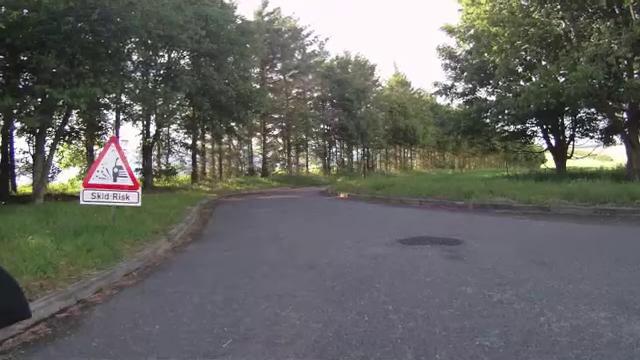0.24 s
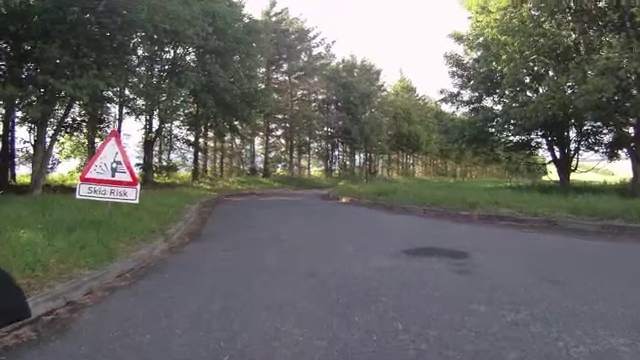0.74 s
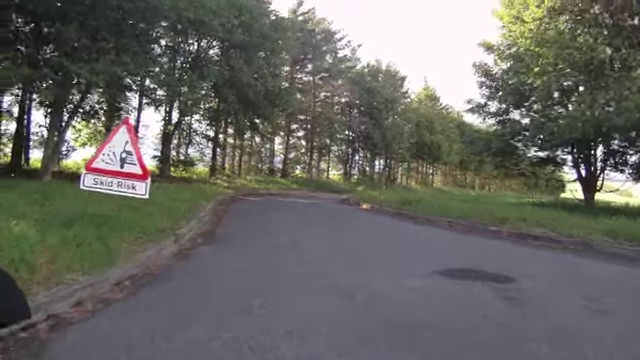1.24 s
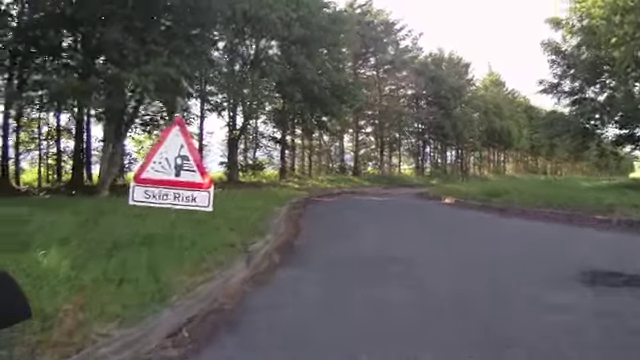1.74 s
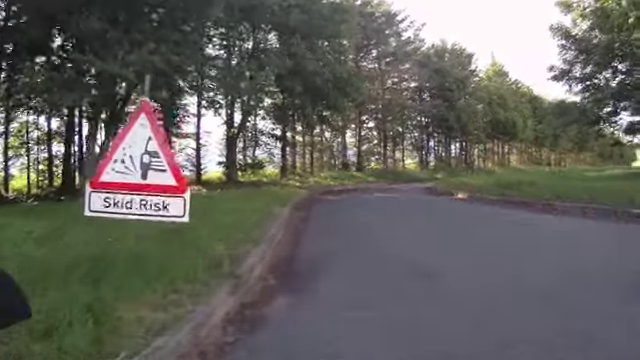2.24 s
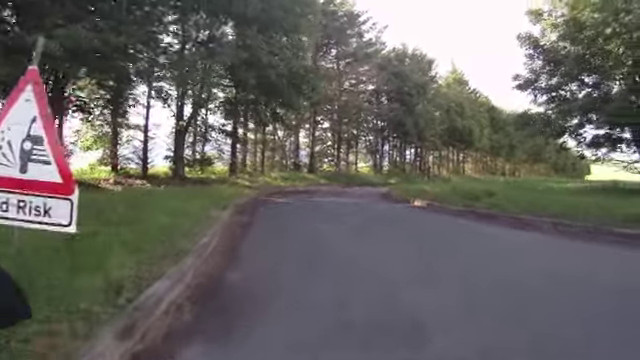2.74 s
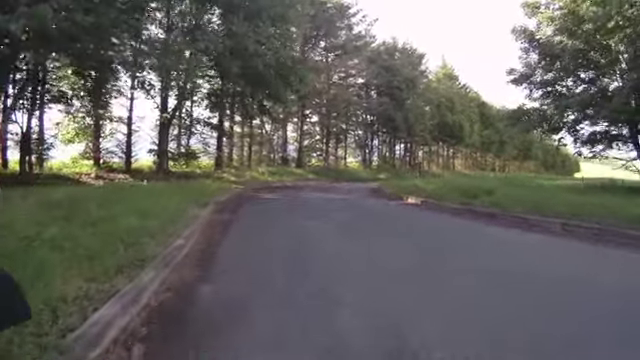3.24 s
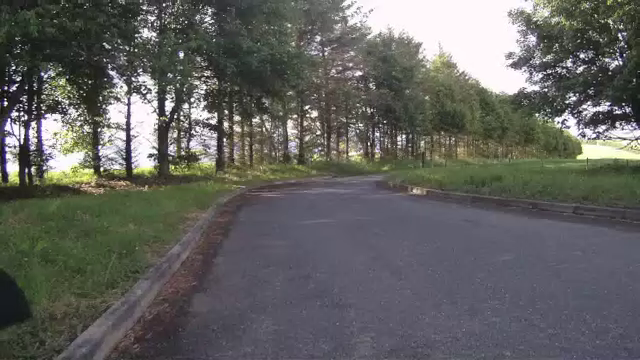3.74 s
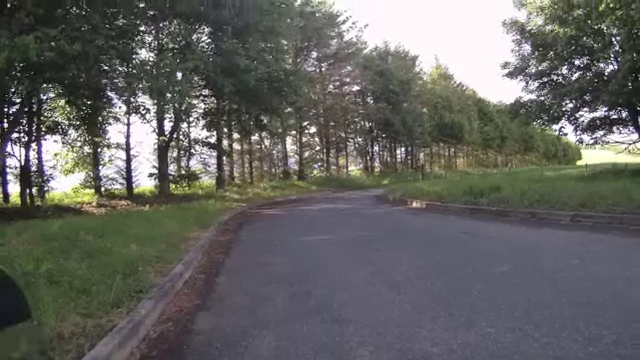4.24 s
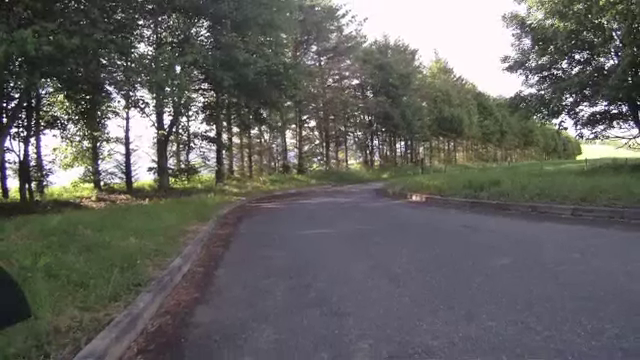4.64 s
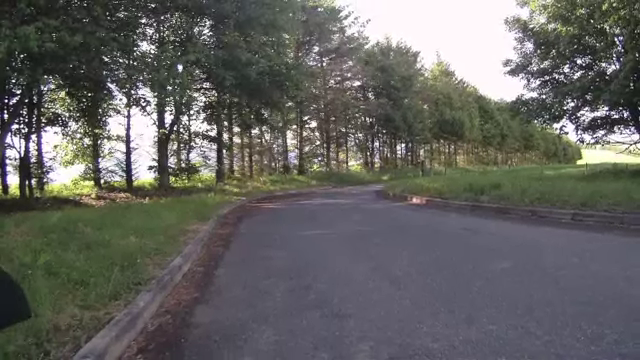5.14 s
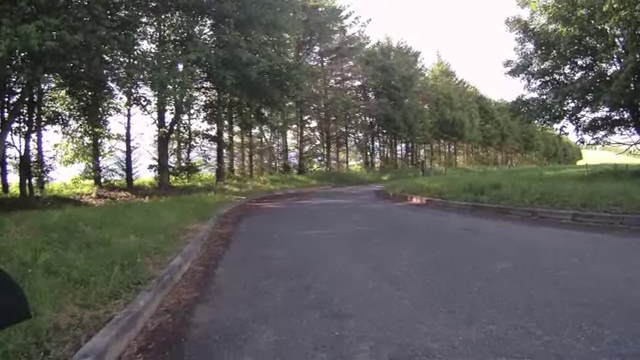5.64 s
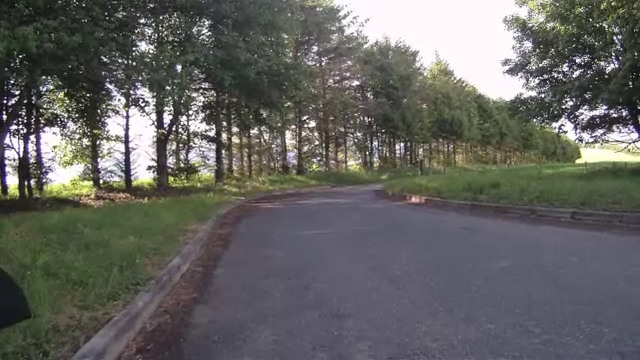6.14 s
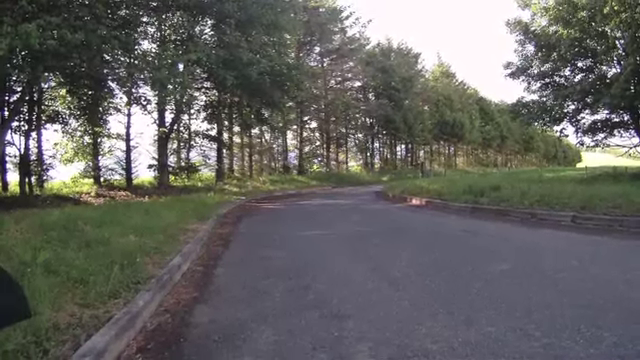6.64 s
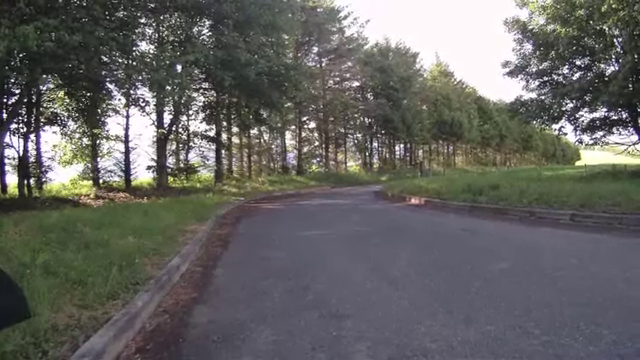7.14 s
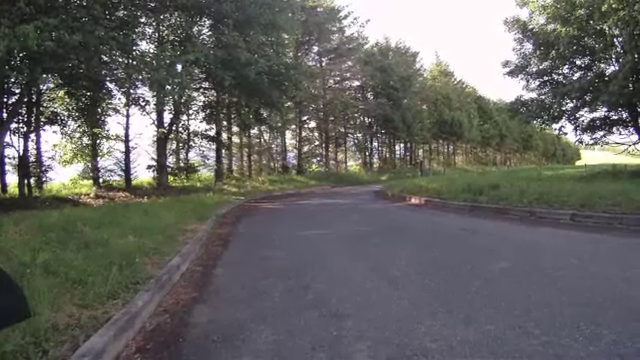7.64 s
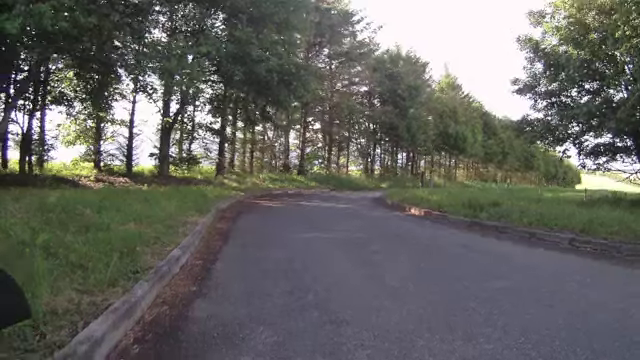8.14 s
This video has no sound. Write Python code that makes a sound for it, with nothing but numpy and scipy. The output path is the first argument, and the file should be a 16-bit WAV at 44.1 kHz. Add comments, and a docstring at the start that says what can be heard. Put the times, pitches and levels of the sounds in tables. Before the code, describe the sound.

Heard from the saddle, a motorbike revs briefly, idles with deep uneven thumps and metallic rattle, then stops with clunks into quiet air.

```python
"""Motorcycle idling and switched off

A motorcycle, heard from on the bike among trees, runs on bursts of throttle, idles and is switched off.
Firing pulses, filtered to swell, make the boom; under throttle the airbox honks with even gulps.
A wavering tone whines once a turn for slack gears, and noise through resonances makes the clatter.
Clunks, made of short scrapes ringing the frame, and faint regular ticks are left in the quiet air."""
import sys
import numpy as np
from scipy import signal
from scipy.fft import rfft, irfft
from scipy.io import wavfile
from scipy.ndimage import uniform_filter1d

SR = 44100
rng = np.random.default_rng(int(sys.argv[2]) if len(sys.argv) > 2 else 0)


def file_out(sig):
    """Save sig as 16-bit WAV at sys.argv[1]."""
    # one column per channel
    cols = np.atleast_2d(sig).T
    # limit, then scale
    lim = np.clip(cols, -1, 1)
    pcm = np.round(lim * 32767).astype(np.int16)
    wavfile.write(sys.argv[1], SR, pcm)


N = 369540
T = np.arange(N) / SR  # time of every sample, in seconds

# crankshaft speed, one firing a turn: [t/s, speed/turns per second]
CRANK_SPEED = [(0.0, 19.16), (0.31, 23.48), (0.95, 27.74), (1.26, 26.31), (1.74, 32.22), (1.85, 23.2),
               (2.16, 19.09), (2.4, 20.21), (2.8, 18.79), (3.1, 20.21), (3.3, 17.97), (3.48, 20.37),
               (3.92, 19.04), (4.55, 20.49), (4.64, 19.13), (5.3, 20.04), (6.16, 19.32), (6.45, 13.32)]
# twists of the throttle: [starts to open t/s, starts to shut t/s, opening 0-1]
THROTTLE_TWISTS = [(-.1, 0.16, 0.44), (0.181, 1.69, 0.77), (1.83, 2.02, 0.43), (3.24, 3.46, 0.32)]
# tone colour of the exhaust: [f/Hz, level/dB]
EXHAUST_COLOUR = [(20, -1), (39, -10), (58, -0.5), (78, -4), (98, 7), (117, 1.5), (137, -18), (157, -4.5),
                  (180, -10.5), (215, -22), (305, -22.5), (450, -30), (900, -77.5)]
# tone colour of the airbox: [f/Hz, level/dB]
AIRBOX_COLOUR = [(15, -19.5), (27, -22), (54, -38), (80, -7.5), (105, -11.5), (130, -0.5), (158, -4.5),
                 (185, -16.5), (220, -22), (300, -33), (420, -37), (600, -38), (1000, -57), (4000, -110)]
# engine parts that rattle:
# [f/Hz, width/Hz, level at idle/dB, added by full throttle/dB, place of the swing/turns, swing/dB]
# (a negative swing makes the part quietest at its place)
RATTLING_PARTS = [(304, 33, 0.5, -5, 0.084, 0), (369, 150, -5.5, 1.5, 0.15, 3.5),
                  (534.4, 25, -13.5, 5, 0.46, -1), (617, 99, -7.5, -1, 0.76, 3),
                  (843, 334, -13, -1.5, 0.77, 1.5), (1185, 97, -0.5, -6, 0.65, 2),
                  (1332, 144, -2, -2, 0.99, 0), (1559, 250, -13.5, 1.5, 0.67, 3),
                  (1980, 610, -18, 2.5, 0.74, 0.5), (2422, 216, -11.5, -1.5, 0.58, 2),
                  (2929, 206, -4, 0.5, 0.72, 0.5), (3658, 248, -5, 0, 0.86, 3),
                  (2855, 1020, -14, 2, 0.79, 10.5), (4397, 570, -17.5, 0.5, 0.75, 2.5)]
# cam drive tones that sing once a turn: [f/Hz, wander/Hz, level/dB, loudest place/turns, swing/dB]
CAM_TONES = [(1543, 24.4, -3, 0.56, 5.5), (3174, 49, -4, 0.52, 16)]
# top end of the valve ticks: [f/Hz, level/dB]
VALVE_COLOUR = [(3500, -23), (4900, 10), (5600, -15.5), (6400, -23), (6800, 6.5), (7200, -5), (7900, 10),
                (8800, 0), (11500, -6), (13000, 5.5), (14500, 7.5), (16000, -6.5)]
# switch clicks and clunks: [t/s, contact time/s, level/dB, brightness/dB per octave, extra thud/dB]
CLUNK_EVENTS = [(1.484, 0.0023, -50, 8.5, 0), (1.926, .02, -35, 4, -7), (5.9607, 0.0022, -23, 2.3, 3),
                (6.0619, 0.0071, -24, .8, 6), (6.1268, 0.0041, -27.5, -1, -8),
                (6.4438, 0.0058, -23, -2, -16), (6.515, .0085, -23, -3.5, -18),
                (6.714, 0.04, -31, -4.5, -3.5), (6.763, 0.019, -24.5, -3, -2),
                (7.1085, 0.0084, -53, 8.5, 23), (7.399, 0.012, -34, -3.5, -5), (7.599, 0.046, -55, -4, -12),
                (7.7371, 0.002, -20.5, -.5, -2), (8.128, 0.073, -61.5, 4, 35.5),
                (8.302, 0.0097, -43, -3.5, 4), (8.3235, .0021, -23, 2, 1), (8.345, .069, -53, 4, 23)]
# resonances of the frame and casings: [f/Hz, width/Hz, level/dB]
FRAME_MODES = [(75.8, 38, 0.5), (143, 61, 2), (300, 46, 5), (474, 250, -4), (597, 66, -3.5), (760, 82, -8),
               (1174, 15, -3), (1314, 87, 3), (1381, 22, -7), (1515, 210, -3), (2380, 200, -10),
               (2863, 180, -1), (3040, 290, -3), (3610, 120, -12), (4500, 500, -14.5), (7750, 2300, -14),
               (13800, 5900, -14.5)]
# how the frame answers a blow and loose parts buzz on, band by band:
# [lowest f/Hz, highest f/Hz, level/dB, buzz level/dB, buzz decay/s]
FRAME_BANDS = [(55, 710, -4.5, -10.5, 0.069), (820, 1570, 0, -27, 0.042), (2260, 4500, -1.5, -28, 0.023),
               (6860, 21000, -20, -4, 0.0085)]
# tone colour of the relay's tick: [f/Hz, level/dB]
RELAY_COLOUR = [(1500, -9), (2500, -19), (2950, 5.5), (3300, -11), (3800, 9), (4600, -26), (8000, -6.5),
                (10500, -18), (14500, 1), (16000, -24)]
# colour of the sound scattered back by the trees: [f/Hz, level/dB]
TREE_COLOUR = [(25, -22), (70, -15), (130, -63), (300, -43), (550, -24), (1200, -59.5), (2800, -56),
               (4500, -52), (8000, -23), (14000, -31)]
# colour of the open air: [f/Hz, level/dB]
AIR_COLOUR = [(20, 6), (50, 0), (130, -3), (210, -12.5), (290, -4.5), (700, -15), (1400, -20.5),
              (2200, -26), (3200, -27), (6000, -30), (15000, -34.5)]

OPEN_S, CLOSE_S = 0.087, 0.1  # time a full-travel ramp of the throttle takes to open and to shut
IDLE_TURNS_PER_S = 19.6
# the whine has faded out, the last strokes end, the clatter starts to fade
WHINE_END_S, LAST_STROKE_S, CLATTER_FADE_START_S = 6.3, 6.44, 6.54

# boom: level at idle, added by full throttle, added by a hard gain of crank speed (taken off by a drop)
BOOM_DB, BOOM_THROTTLE_DB, BOOM_PULL_DB = -15.5, 5.5, 0.5
PULL_TURNS_PER_S2 = 18  # the change of speed that counts as a hard pull

# gear whine: level with slack gears, change under full throttle, pitch, waver within each turn
WHINE_DB, WHINE_THROTTLE_DB, WHINE_HZ, WAVER_HZ = -24, -22, 1202, 29
WHINE_HZ_PER_TURN = 9  # the whine rises and sags with idle speed (Hz per turn a second)
# the gear teeth strike late in each turn; all of these are in turns
STRIKE_AT, STRIKE_ATTACK, STRIKE_FALL, WHINE_LENGTH, WHINE_RELEASE = 0.715, 0.13, 0.39, 0.91, 0.18
STRIKE_DB = 13  # the blow above the held whine

# clatter: overall gain at idle, added by full throttle, added per doubling of speed, final fade
CLATTER_DB, CLATTER_THROTTLE_DB, CLATTER_SPEED_DB, CLATTER_FADE_DB_PER_S = -26.8, 3.5, 5.5, 107

CLUNK_PIVOT_HZ = 1200  # brightness tilts about this pitch; bands below it take the thud
TICK_START_S, TICK_EVERY_S, TICK_DB = 6.638, 0.3088, -43
AIR_DB = -49
RUMBLE_CUT_HZ, TOP_HZ = 16, 15350  # lowest and highest pitch picked up


def boom(speed, turns, throttle):
    """The silencer draws each firing out into a rising throb; the airbox gulps, hard and evenly under throttle."""
    # turns + 1 starts these counts one turn earlier
    firings = strokes(turns + 1, place=0.63, scatter=0.02, uneven_db=3.6, lope_db=0.5)
    exhaust = even(colour(firings, EXHAUST_COLOUR, attack=0.31, sweep_s=0.054))

    idle_gulps = strokes(turns, place=0.2824, scatter=0.034, uneven_db=4.0, lope_db=-3.5)
    open_gulps = strokes(turns + 1, place=0.83, scatter=0.0014, uneven_db=1.0)
    idle = undb(-9) * (1 - throttle) * even(colour(idle_gulps, AIRBOX_COLOUR, attack=0.41))
    honk = throttle * even(colour(open_gulps, AIRBOX_COLOUR, attack=0.53, sweep_s=0.023))

    speed_change = uniform_filter1d(np.gradient(speed) * SR, SR // 20)
    pull = np.tanh(speed_change / PULL_TURNS_PER_S2)
    level_db = BOOM_DB + BOOM_THROTTLE_DB * throttle + BOOM_PULL_DB * pull
    running = np.sqrt(np.clip((LAST_STROKE_S + 0.017 - T) / 0.2, 0, 1))
    return even((1 - 0.98 * throttle) * exhaust + idle + honk) * undb(level_db) * running


def backlash(speed, turns, throttle):
    """Unloaded gears strike once a turn and whine on, wavering with the crank; a wide throttle quiets them."""
    hunting_hz = WHINE_HZ_PER_TURN * np.clip(speed - IDLE_TURNS_PER_S, -2, 2)
    waver_hz = WAVER_HZ * np.cos(2 * np.pi * (turns - 0.06))
    pitch = WHINE_HZ + hunting_hz + waver_hz + 14 * walk(72.5)

    age = (turns + 0.015 * walk(34) - STRIKE_AT) % 1  # turns since the whine began
    attack = np.clip(age / STRIKE_ATTACK, 0, 1)
    release = np.clip((WHINE_LENGTH - age) / WHINE_RELEASE, 0, 1)
    blow_db = STRIKE_DB * np.exp(-abs(age - STRIKE_ATTACK) / STRIKE_FALL) + 0.8 * walk(130)
    tone = attack * release * undb(blow_db) * np.sin(2 * np.pi * np.cumsum(pitch) / SR)

    idling = np.clip((WHINE_END_S - T) / 0.033, 0, 1)
    return even(tone) * undb(WHINE_DB + WHINE_THROTTLE_DB * throttle ** 3) * idling


def clatter(speed, turns, throttle):
    """Chain and valve gear shake each part in step with the turn; two valve ticks a turn add the top."""
    rattle = 0
    for hz, width, db, load_db, place, swing_db in RATTLING_PARTS:
        drive = grit(spread_db=3.5) * undb(swing_db * np.cos(2 * np.pi * (turns - place)))
        part = unit(ring(ring(drive, hz, width), hz, width))
        rattle = rattle + part * undb(db + load_db * throttle)

    stopping = np.clip((LAST_STROKE_S - T) / 0.13, 0, 1)
    for hz, wander_hz, db, place, swing_db in CAM_TONES:
        tone = np.sin(2 * np.pi * np.cumsum(hz + wander_hz * walk(173)) / SR)
        swell_db = swing_db * np.cos(2 * np.pi * (turns - place)) + 3.3 * walk(120)
        rattle = rattle + unit(tone * undb(swell_db)) * undb(db - 6.3 * throttle) * stopping

    first_tick = np.exp(-((turns - 0.2) % 1) / 0.046)
    second_tick = np.exp(-((turns - 0.8) % 1) / 0.089)
    seating = 0.44 + first_tick + second_tick
    # the cooling fins ring briefly in many close modes
    fins = rng.standard_normal(SR // 20) * np.exp(-T[:SR // 20] / 0.0021)
    fins[0] += 14  # the direct sound, ahead of the ringing
    ticks = signal.fftconvolve(grit(spread_db=4.0) * seating, fins)[:N]
    top = unit(colour(ticks, VALVE_COLOUR))

    speed_db = CLATTER_SPEED_DB * np.log2(speed / IDLE_TURNS_PER_S)
    level_db = CLATTER_DB + CLATTER_THROTTLE_DB * throttle + speed_db
    dying_db = -CLATTER_FADE_DB_PER_S * (T - CLATTER_FADE_START_S).clip(0)
    return (undb(-6.0) * rattle + undb(-26.0) * top) * undb(level_db + dying_db)


def clunks():
    """Each contact is a short noisy scrape that rings the frame, with its own length, brightness and thud;
    loose parts buzz on after it."""
    out, t = np.zeros(N + SR), T[:SR // 2]
    for s, contact, db, bright_db, thud_db in CLUNK_EVENTS:
        for lo, hi, band_db, buzz_db, buzz_s in FRAME_BANDS:
            fading = np.exp(-t / contact) + undb(buzz_db) * np.exp(-t / buzz_s)
            push = rng.standard_normal(len(t)) * fading
            body = 0
            for hz, width, mode_db in FRAME_MODES:
                if lo < hz < hi:
                    body = body + undb(mode_db) * ring(push, hz, width) / np.sqrt(width)
            band = signal.butter(3, [lo, hi], "band", fs=SR, output="sos")
            part = signal.sosfilt(band, body)
            part = part / part[:SR // 50].std()  # level set by the first fiftieth of a second
            tilt_db = bright_db * np.log2(np.sqrt(lo * hi) / CLUNK_PIVOT_HZ)
            tilt_db += thud_db * (hi < CLUNK_PIVOT_HZ)
            out[int(s * SR):][:len(t)] += undb(db + band_db + tilt_db) * part
    return out[:N]


def relay(decay_s):
    """A relay ticks evenly: each tick is a burst of coloured noise that dies at once."""
    since_tick = (T - TICK_START_S) % TICK_EVERY_S
    push = (T >= TICK_START_S) * np.exp(-since_tick / decay_s)
    return undb(TICK_DB) * push * unit(colour(rng.standard_normal(N), RELAY_COLOUR))


def trees(x, decay_s):
    """Trees scatter the bike's sound back as a faint, short wash, opposite in sign at the two ears."""
    tail = rng.standard_normal(SR // 4) * np.exp(-T[:SR // 4] / decay_s)
    wash = signal.fftconvolve(x, tail / np.linalg.norm(tail))[:N]
    return colour(wash, TREE_COLOUR) * np.array([[1], [-1]])


def quiet(hum_hz, hum_db, side_db):
    """Open air is soft coloured noise, slightly different at the two ears, with a faint steady hum."""
    mid = unit(colour(grit(spread_db=0.5), AIR_COLOUR))
    side = unit(colour(grit(spread_db=0.5), AIR_COLOUR))
    hum = undb(hum_db) * np.sin(2 * np.pi * hum_hz * T)
    return undb(AIR_DB) * (mid + undb(side_db) * side * np.array([[1], [-1]])) + hum


def twist():
    """Throttle opening 0-1: each twist opens, holds and shuts."""
    total = 0
    for start, end, opening in THROTTLE_TWISTS:
        opened = np.clip((T - start) / OPEN_S, 0, 1)
        not_shut = np.clip(1 - (T - end) / CLOSE_S, 0, 1)
        total = total + opening * opened * not_shut
    return np.clip(total, 0, 1)


def strokes(turns, place, scatter, uneven_db, lope_db=0):
    """One pulse a turn, each a little off in time and size; lope makes them alternate in strength."""
    count = np.arange(int(np.interp(LAST_STROKE_S, T, turns)))
    chance = rng.standard_normal((len(count), 2))
    at = np.interp(count + place + scatter * chance[:, 0], turns, np.arange(N)).astype(int)
    out = np.zeros(N)
    out[at] = undb(uneven_db * chance[:, 1] + lope_db * (count % 2 - 0.5))
    return out


def grit(spread_db):
    """Dense noise whose strength jumps at random every 48 samples, like tiny unequal impacts."""
    size = 48
    strength = undb(spread_db * rng.standard_normal(N // size + 1))
    return rng.standard_normal(N) * np.repeat(strength, size)[:N]


def walk(rate):
    """Smooth random wandering, about rate changes a second, rms 1."""
    size = int(SR / rate)
    return unit(uniform_filter1d(uniform_filter1d(rng.standard_normal(N), size), size))


def ring(x, hz, width):
    """One resonance, gain 1 at its centre."""
    b, a = signal.iirpeak(min(hz, SR * 9 / 20), hz / width, fs=SR)
    return signal.lfilter(b, a, x)


def colour(x, points, attack=1, sweep_s=0):
    """Filter through (Hz, dB) points; attack under 1 lets a pulse swell first, sweep makes the deepest bass lead."""
    size = 16384
    hz, db = np.transpose(points)
    f = np.fft.rfftfreq(size, 1 / SR)
    log_gain = np.log(undb(np.interp(np.log(f + 1), np.log(hz), db)))
    # the phase that puts a pulse's energy as early as possible; attack scales it
    lag = 2 * rfft(irfft(log_gain)[:size // 2], size).imag
    # the delay grows with pitch up to sweep_s at 200 Hz, then stays there
    dispersion = -2 * np.pi * np.cumsum(sweep_s * np.minimum(f / 200, 1)) * f[1]
    response = np.fft.fftshift(irfft(np.exp(log_gain + 1j * (attack * lag + dispersion))))
    return signal.fftconvolve(x, response)[size // 2:][:len(x)]


def even(x):
    """Level evened out over about a third of a second, so that single firings keep their differences."""
    size = SR // 6
    power = uniform_filter1d(uniform_filter1d(x ** 2, size), size).clip(0)
    return x / np.sqrt(power + np.mean(x ** 2) / 100)


def unit(x):
    """Scaled to rms 1."""
    return x / np.sqrt(np.mean(x ** 2) + 1e-20)


def curve(rows):
    """Rows (s, value) joined by straight lines."""
    return np.interp(T, *np.transpose(rows))


def undb(db):
    """Decibels to gain."""
    return 10 ** (np.asarray(db) / 20)


def scene():
    """One crankshaft and one throttle drive all of the engine's sounds; the bike sits in the middle."""
    speed, throttle = curve(CRANK_SPEED), twist()
    turns = np.cumsum(speed) / SR
    engine = boom(speed, turns, throttle) + backlash(speed, turns, throttle) + clatter(speed, turns, throttle)
    bike = engine + clunks() + relay(decay_s=0.0096)
    return bike + trees(bike, decay_s=0.017) + quiet(hum_hz=180.0, hum_db=-54.5, side_db=-12)


def record(dry):
    """The pickup gently thins the deepest rumble and steeply cuts the top."""
    rumble_cut = signal.butter(1, RUMBLE_CUT_HZ, "high", fs=SR, output="sos")
    top_cut = signal.ellip(10, 0.2, 80, TOP_HZ, fs=SR, output="sos")
    return signal.sosfilt(top_cut, signal.sosfilt(rumble_cut, dry))


dry = scene()
out = record(dry)
file_out(out)
```